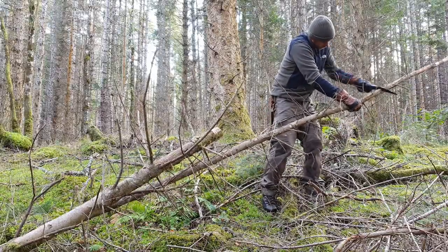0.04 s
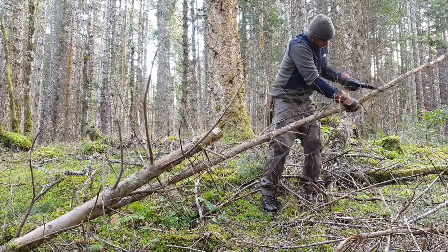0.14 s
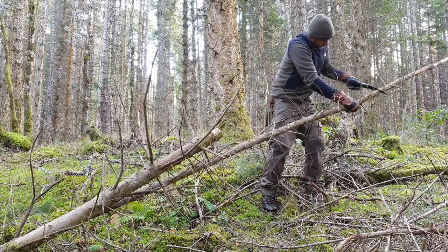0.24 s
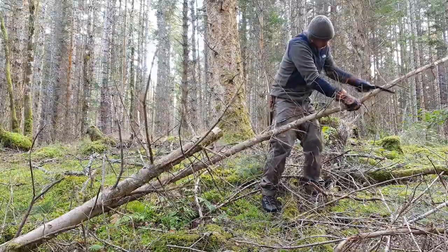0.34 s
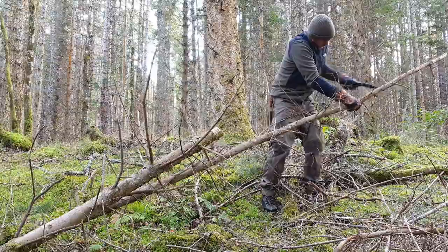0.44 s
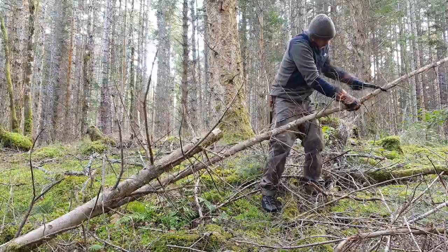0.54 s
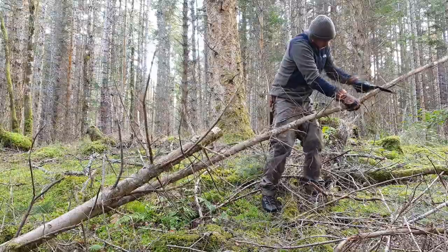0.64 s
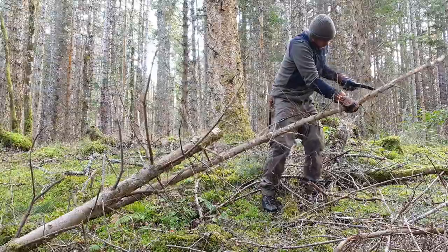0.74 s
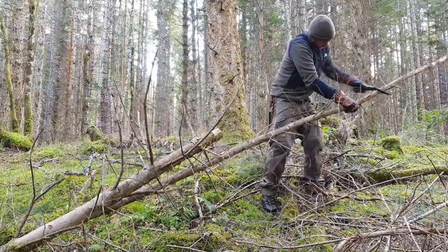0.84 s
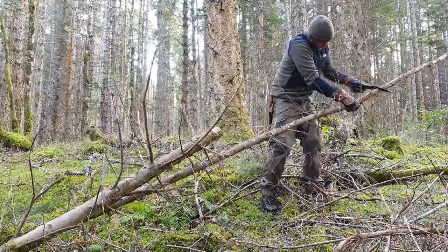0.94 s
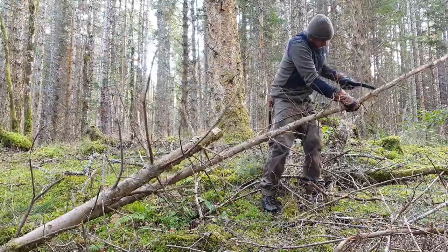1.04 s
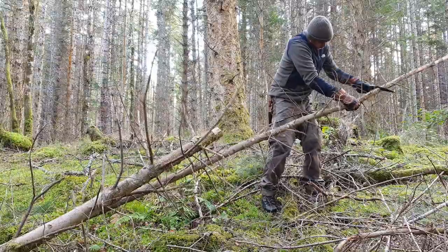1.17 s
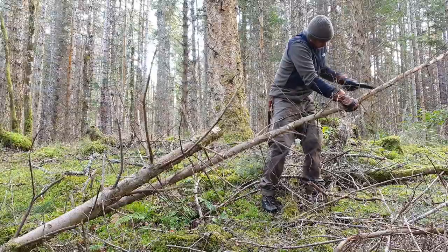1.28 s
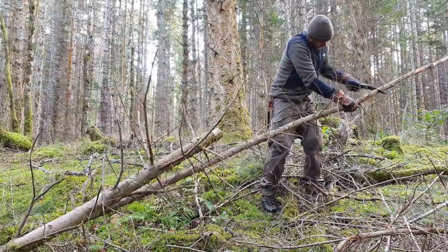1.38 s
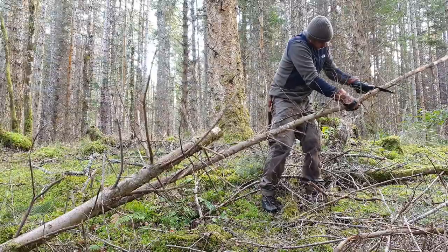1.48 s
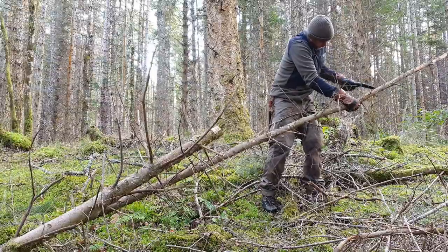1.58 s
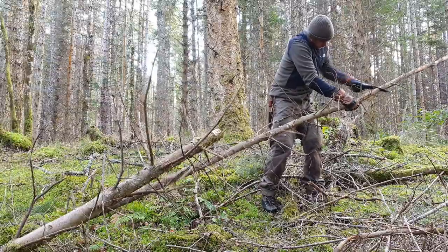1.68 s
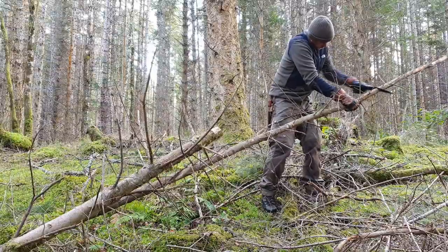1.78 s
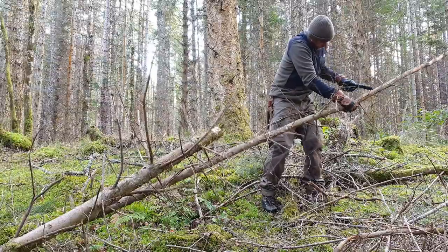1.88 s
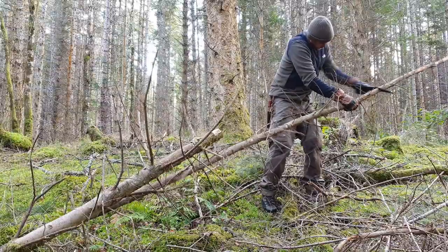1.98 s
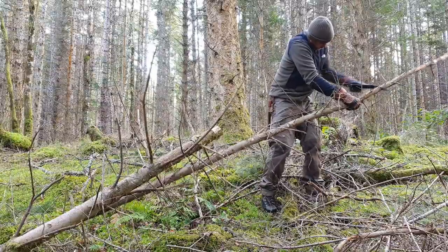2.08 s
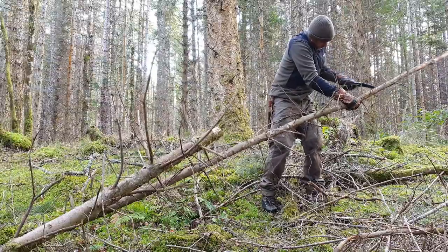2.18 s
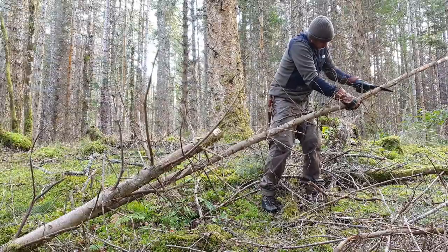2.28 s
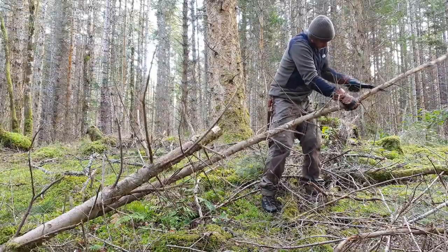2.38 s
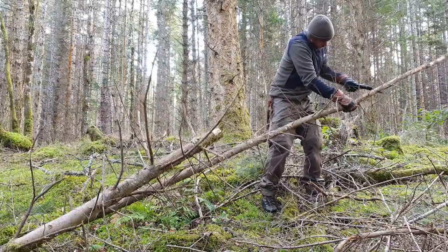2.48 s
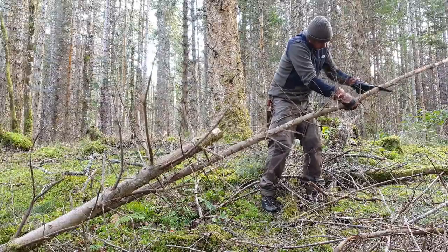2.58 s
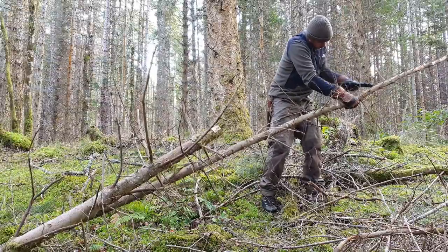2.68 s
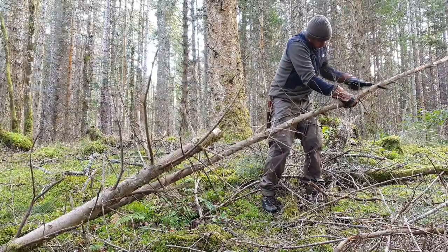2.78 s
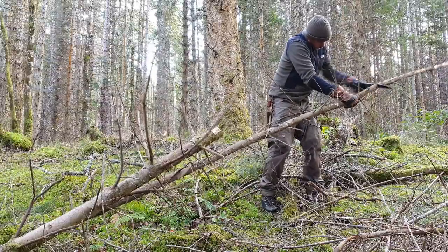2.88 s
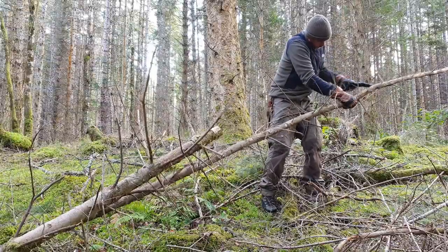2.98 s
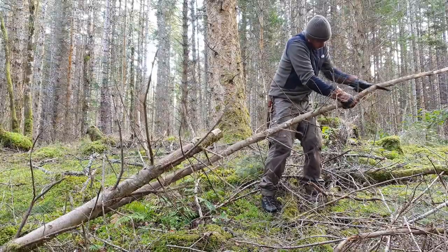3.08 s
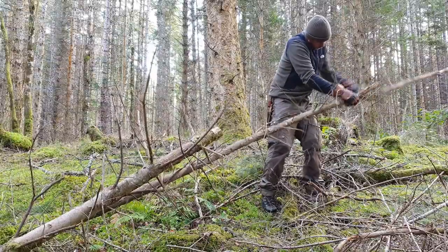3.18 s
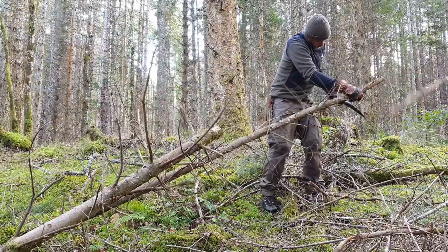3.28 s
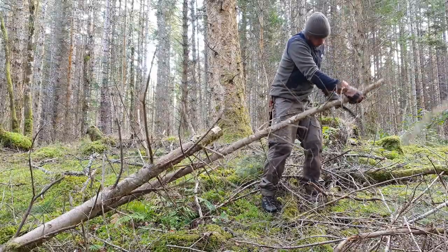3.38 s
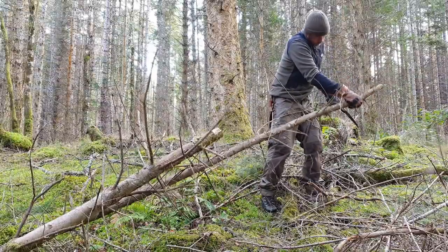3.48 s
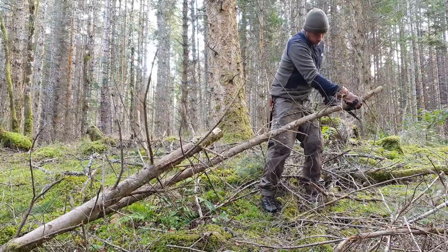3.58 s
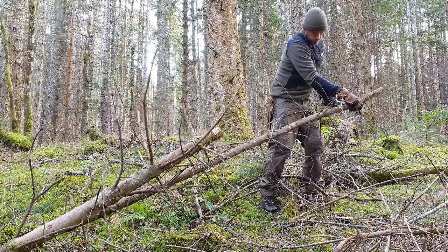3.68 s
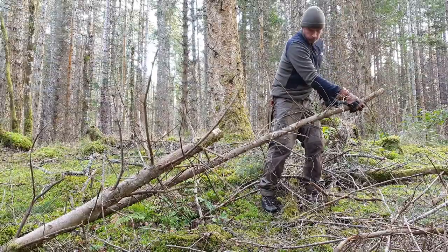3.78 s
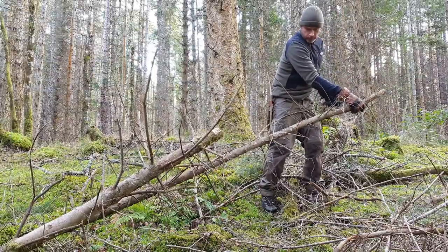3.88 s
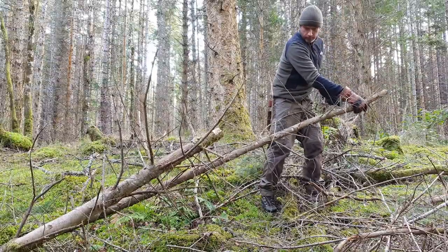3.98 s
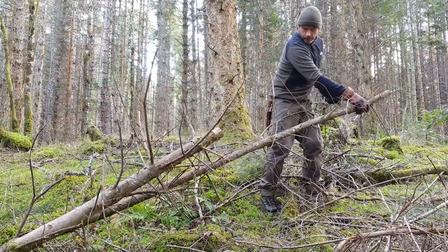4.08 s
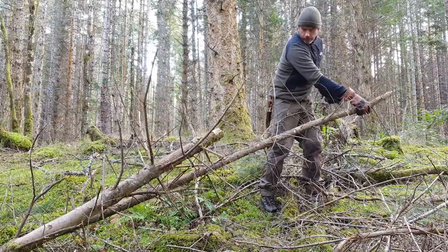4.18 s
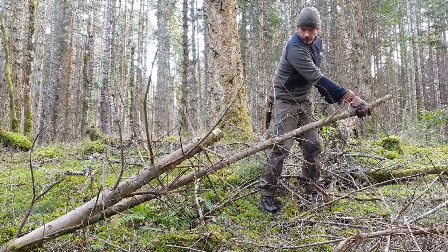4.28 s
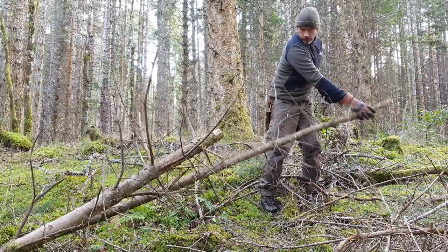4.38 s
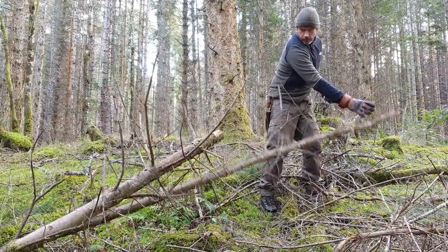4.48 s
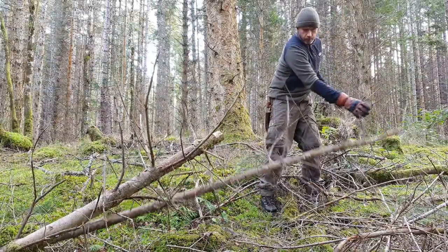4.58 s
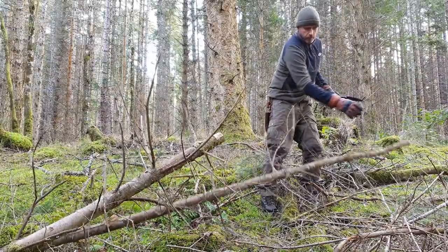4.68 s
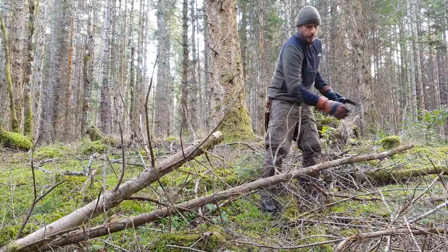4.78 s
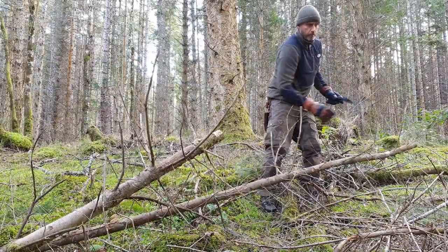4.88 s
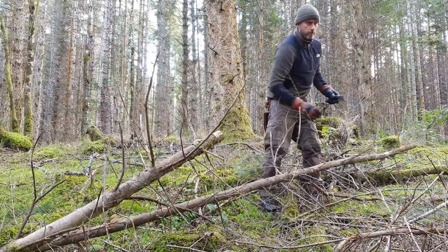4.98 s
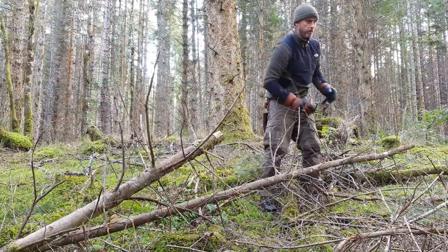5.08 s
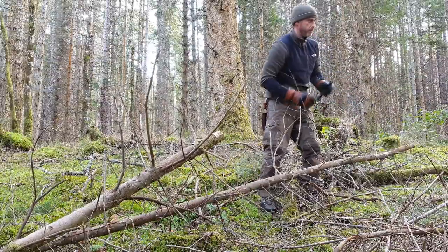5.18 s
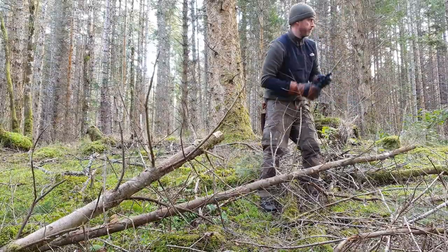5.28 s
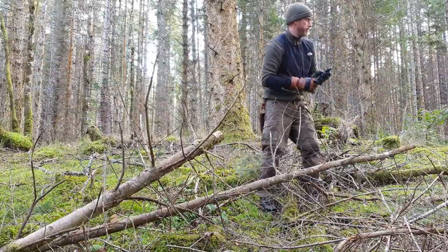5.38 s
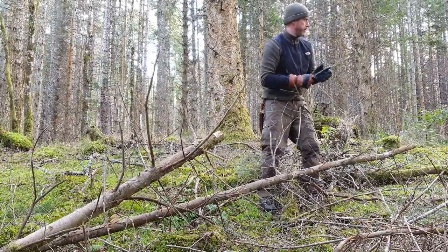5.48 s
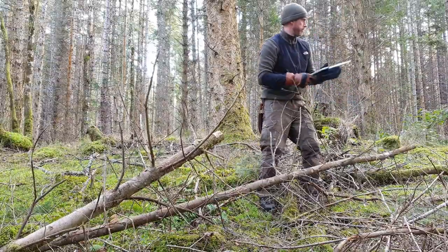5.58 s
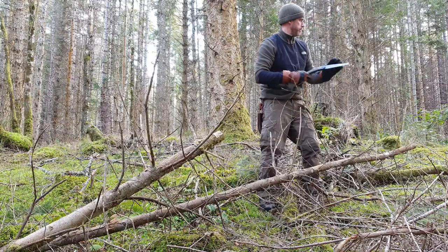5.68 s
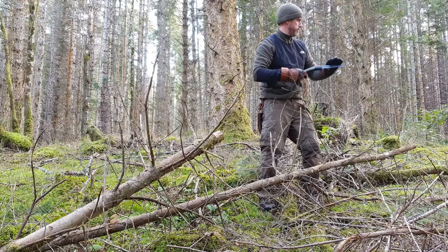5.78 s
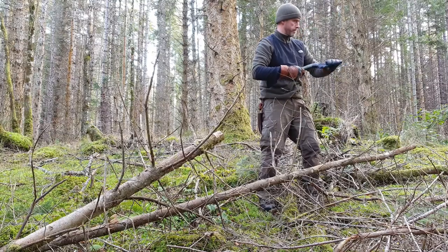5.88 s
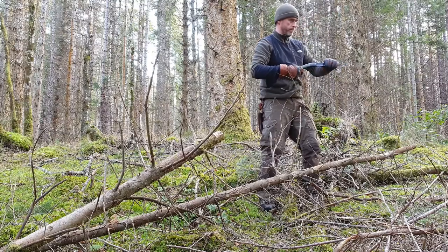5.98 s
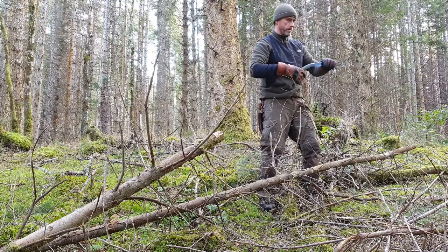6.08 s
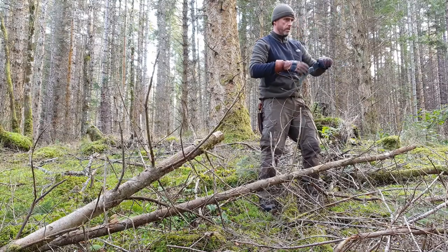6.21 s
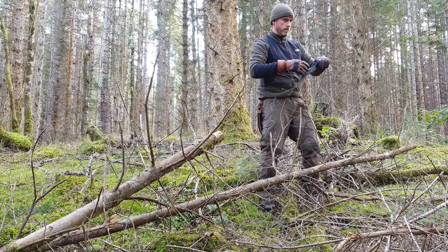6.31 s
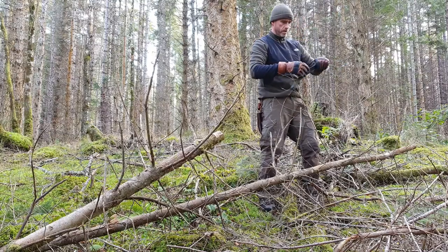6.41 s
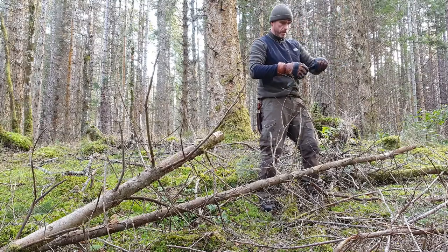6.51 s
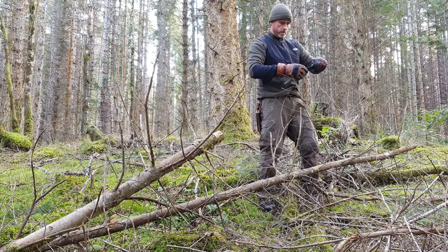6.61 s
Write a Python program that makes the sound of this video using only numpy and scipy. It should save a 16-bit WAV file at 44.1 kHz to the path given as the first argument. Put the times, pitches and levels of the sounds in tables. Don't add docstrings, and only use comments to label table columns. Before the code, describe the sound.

Fast, even sawing of dry wood outdoors ends in a sharp crack, landing clatter, a dropped stem snapping brushwood, and a faint folding scrape.

```python
import sys
import numpy as np
from scipy import signal
from scipy.fft import rfft, irfft, next_fast_len
from scipy.io import wavfile
from scipy.ndimage import uniform_filter1d

SR = 44100
rng = np.random.default_rng(int(sys.argv[2]) if len(sys.argv) > 2 else 0)


def store_pcm(level_fs):
    pcm = np.round(np.clip(level_fs, -1, 1) * 32767).astype(np.int16)
    wavfile.write(sys.argv[1], SR, np.atleast_2d(pcm).T)


def to_linear_factor(level_db):
    exponent = np.asarray(level_db, float) / 20
    return 10 ** exponent


N = 293253
TIME = np.arange(N) / SR


def evened(x):
    return x / np.sqrt(np.mean(x ** 2) + 1e-20)


def slow(noise, size):
    return evened(uniform_filter1d(uniform_filter1d(noise, size), size))


def read(points, hz):
    f, value = np.transpose(points)
    return np.interp(np.log(hz + 1), np.log(f + 1), value)


def add(mix, s, sound):
    start = round(s * SR)
    sound = sound[..., max(-start, 0):]
    part = mix[..., max(start, 0):][..., :sound.shape[-1]]
    part += sound[..., :part.shape[-1]]


def coloured(x, points):
    log_gain = read(points, np.fft.rfftfreq(4096, 1 / SR)) * np.log(10) / 20
    both_sides = np.r_[log_gain, log_gain[-2:0:-1]]
    minimum_phase = np.exp(np.conj(signal.hilbert(both_sides)))
    taps = np.fft.ifft(minimum_phase).real[:2048]
    return signal.oaconvolve(x, taps / np.linalg.norm(taps))[:len(x)]


def resonate(x, hz, width):
    r = np.exp(-np.pi * width / SR)
    return 2 * signal.lfilter([1 - r], [1, -r * np.exp(2j * np.pi * hz / SR)], x).real


def above(x, hz):
    return signal.sosfilt(signal.butter(2, hz, "high", fs=SR, output="sos"), x)


def below(x, hz):
    return signal.sosfilt(signal.butter(2, hz, "low", fs=SR, output="sos"), x)


# pitch_hz, level_db
PORT_DIFFERENCE = [(380, 1.5), (1290, 3), (2380, 1.5), (3100, 4), (4000, 2.5), (5400, 6), (7000, 1),
                   (9000, -4), (11500, -1), (15000, 0)]
# pitch_hz, turn_radians
PORT_TURN = [(700, 0), (1380, .3), (2330, 1.5), (3360, 0), (8000, -2), (10600, 0)]


def placed(x, lag, wet_db, shade=1):
    size = next_fast_len(len(x) + 64)
    hz = np.fft.rfftfreq(size, 1 / SR)
    aside = np.clip(lag / 6.5, 0, 1)
    phase = -np.pi * hz * lag / SR + .5 * aside ** 2 * read(PORT_TURN, hz)
    left = to_linear_factor(shade * read(PORT_DIFFERENCE, hz) / 2) * np.exp(1j * phase)
    spectrum = rfft(np.r_[np.zeros(32), x], size)
    pair = irfft(spectrum * np.array([left, 1 / left]), size)[:, 32:32 + len(x)]
    return pair, to_linear_factor(wet_db) * x


# pitch_hz, t60_s
FOREST_T60 = [(300, 0.808), (1500, 0.17), (4000, 0.42), (12000, 0.11)]
# pitch_hz, level_db
SCATTER = [(300, -5.5), (1000, -2), (3000, 1), (12000, 1.5)]


def forest(x):
    taps = np.zeros((2, SR))
    at = np.arange(100, SR - 20, 20) + rng.integers(0, 20, (2, (SR - 101) // 20))
    np.put_along_axis(taps, at, rng.choice([-1., 1.], at.shape), 1)
    hz, t, z = signal.stft(taps, SR, nperseg=256)
    trunks = to_linear_factor(-60 * t / read(FOREST_T60, hz)[:, None])
    ground = to_linear_factor(-60 * t / .075)
    fall = trunks * (1 + ground)
    tail = signal.istft(z * fall * to_linear_factor(read(SCATTER, hz))[:, None], SR, nperseg=256)[1]
    return signal.fftconvolve(x[None], tail / np.linalg.norm(tail[0]), axes=1)[:, :N]


def patchy(x):
    z = signal.stft(x, nperseg=256)[2]
    field = rng.standard_normal(z.shape[1:])
    field = evened(uniform_filter1d(uniform_filter1d(field, size=4, axis=0), size=6, axis=1))
    return signal.istft(z * to_linear_factor(2.5 * field), nperseg=256)[1][:, :N]


# start_s, length_s, rasp_db, tooth_knocks_db, upper_modes_db
STROKES = [(-0.04, 0.1646, -43.5, -7, 12.5), (0.105, 0.1304, -40.5, -2, 2.5),
           (0.252, 0.133, -45.5, -5.5, -8), (0.382, 0.1488, -40, -0.5, -4.5),
           (0.535, 0.1399, -41.5, 0.5, 4.5), (0.68, 0.1223, -38.5, -0.5, -3), (0.815, 0.1267, -42.5, 1, 4),
           (0.945, 0.1501, -38.5, -13, -18), (1.099, 0.119, -41, -2, 11),
           (1.245, 0.1237, -38.5, -9.5, -10.5), (1.375, 0.1335, -41, 1, -29), (1.505, 0.1422, -38.5, -3, 0),
           (1.654, 0.1278, -38.5, 0, 3.5), (1.797, 0.1288, -39.5, 2.5, 0), (1.93, 0.1445, -41, -0.5, 3),
           (2.07, 0.138, -39, 5.5, 13), (2.216, 0.1434, -41.5, 0, 4), (2.365, 0.131, -44, 0, -8),
           (2.494, 0.142, -44.5, 2.5, -18), (2.618, 0.137, -36.5, -6.5, 1.5),
           (2.77, 0.1259, -41.5, -6, -13), (2.898, 0.1171, -37.5, -1, 13.5),
           (3.046, 0.1104, -42.5, -4.5, -2.5)]
# start_s, length_s, grit_db
CONTACT = [(0.002, 0.081, -57.0), (0.124, 0.092, -54.2), (0.277, 0.074, -57.3), (0.412, 0.091, -52.5),
           (0.556, 0.088, -56.2), (0.7, 0.085, -53.1), (0.85, 0.062, -52.6), (0.973, 0.105, -52.8),
           (1.114, 0.099, -54.1), (1.264, 0.099, -53.1), (1.393, 0.086, -50.4), (1.529, 0.096, -53.1),
           (1.682, 0.083, -53.3), (1.818, 0.088, -54.9), (1.963, 0.085, -56.8), (2.085, 0.1, -51.3),
           (2.239, 0.096, -58.3), (2.395, 0.078, -58.3), (2.529, 0.075, -57.0), (2.637, 0.098, -50.4),
           (2.798, 0.061, -53.1), (2.914, 0.086, -49.3), (3.074, 0.084, -54.5)]
ARM = [(0.49, 60), (0.44, 58)]
# pressure_gain_along_stroke_db, fibre_drive_db, low_modes_gain_along_stroke_db
LEAN = [(-6.5, 6.5, -0.5), (10.5, 8.5, 11)]
LIFTED = [(.4, .13), (.13, .4)]
# pitch_hz, level_db_per_hz
PUSH_RASP = [(150, -17.5), (300, -24), (600, -12.5), (800, -14.5), (1330, -7.5), (2050, -6.5), (2600, -12),
             (4200, -12.5), (6500, -18.5), (10000, -19.5), (16000, -26)]
# pitch_hz, level_db_per_hz
PULL_RASP = [(150, -33), (300, -12.5), (550, -14.5), (1100, -4), (1400, -4.5), (1900, -6.5), (2600, -11.5),
             (4200, -9.5), (6500, -15.5), (10000, -18), (16000, -22.5)]
# pitch_hz, width_hz, push_db, pull_db
BRANCH = [(373, 167.5, -6.5, -6.5), (554.3, 184, -4.5, -9), (799.9, 63.7, -5, -6), (975.3, 21.6, 3, -2.5),
          (1107, 90, -5, -10.5), (1209.4, 21.1, -12, 0.5), (1675.6, 79, -12.5, -7.5),
          (2033.3, 71.4, -2, -15.5), (2625, 110, -12.5, -21.5)]


def saw():
    ringing, body, grit, blade = np.zeros((4, N))
    for k, (s, length, rasp_db, knock_db, upper_db) in enumerate(STROKES):
        way = k % 2
        place, tooth_count = ARM[way]
        pressure_db, fibre_db, low_db = LEAN[way]
        chance = rng.standard_normal((4 + len(BRANCH), int(length * SR)))
        u = np.linspace(0, 1, chance.shape[1])
        speed = np.sin(np.pi * u ** (np.log(.5) / np.log(place)))

        tooth_hz = tooth_count / length * np.sqrt(speed) * (1 + .08 * slow(chance[0], size=100))
        turns = np.cumsum(tooth_hz) / SR
        bite = to_linear_factor(4.2 * slow(chance[1], size=160))
        tooth_hits = np.diff(np.floor(turns), prepend=0) * bite * to_linear_factor(2 * chance[2])
        puffs = (0.5 + np.exp(-(turns % 1) / 0.356)) * np.sqrt(bite)
        fibres = chance[3] * puffs
        drive = to_linear_factor(knock_db) * evened(tooth_hits) + to_linear_factor(fibre_db - 9.5) * evened(fibres)

        bend = 1 + .025 * chance[2, 0]
        wood = np.zeros(len(u))
        for m, (hz, width, *db) in enumerate(BRANCH):
            upper, width = hz > 1900, max(width, 40)
            grip_db = 2.81 * slow(chance[4 + m], size=500)
            mode_db = db[way] + upper_db * upper + low_db * (u - .5) * (hz < 850) + grip_db
            mode = resonate(resonate(drive, hz * bend, 1.795 * width), hz * bend, 2.024 * width)
            wood += (-1) ** m * to_linear_factor(mode_db) * speed ** (1.6 * upper) * mode

        colour = (PUSH_RASP, PULL_RASP)[way]
        rasp = coloured(evened(fibres), colour)
        hiss = coloured(evened(chance[3, ::-1] * puffs), colour)
        free = np.clip((speed - 0.0886) / 0.67, .12, 1)
        force = to_linear_factor(rasp_db + pressure_db * (u - .5)) * free

        start, span, grit_db = CONTACT[k]
        since = s + u * length - start
        edge = np.minimum(since, span - since) / .012 + .7
        touch = np.clip(edge, np.where(u < .5, *LIFTED[way]), 1)
        touch = to_linear_factor(grit_db + 12.5) * speed ** 0.15 * touch / np.sqrt(bite)
        add(blade, s, to_linear_factor(-5) * touch * speed ** 0.58 * hiss)
        add(grit, s, touch * rasp)
        add(body, s, force * speed ** 0.906 * rasp)
        add(ringing, s, force * speed ** 0.239 * to_linear_factor(9.5) * wood)
    body, grit, blade = patchy(np.array([body, grit, blade]))
    kerf = ringing + below(body, 4516) + above(grit, 4516)
    near, far = placed(kerf, 7.19, -4.5)
    return near + placed(above(blade, 2370), -2, -99)[0], far


# pitch_hz, level_db_per_hz
HUSH = [(15, -43.5), (25, -23.5), (58, -3.5), (102, -15), (133, -12), (157, -33), (198, -14.5), (238, -19),
        (399, -15.5), (481, -17), (742, -16), (900, -19), (1600, -28.5), (3500, -51.5), (4550, -90),
        (7700, -120)]
# pitch_hz, likeness
LIKENESS = [(60, 1), (240, 0.942), (950, 0.0031), (3770, 0.14), (15000, 0.24)]
# time_s, level_db
DRONE = [(4.8, -85), (5.1, -81), (6.65, -87.5)]


def hush():
    frames, hz = N // 512 + 5, np.fft.rfftfreq(2048, 1 / SR)
    a, b, c, d = rng.standard_normal((frames, 1025, 4)).T
    same = np.clip(read(LIKENESS, hz), -1, 1)[:, None]
    left = a + 1j * b
    right = same * left + np.sqrt(1 - same ** 2) * (c + 1j * d)
    z = np.array([left, right]) * to_linear_factor(read(HUSH, hz)[:, None])
    air = evened(signal.istft(z, nperseg=2048, noverlap=1536)[1][:, :N])
    air = to_linear_factor(-60) * to_linear_factor([[2.5], [-.4]]) * air
    drone = evened(resonate(rng.standard_normal(N), 100, 5.8))
    return air + to_linear_factor(np.interp(TIME, *np.transpose(DRONE))) * drone


# time_s, peak_db, pitch_hz, width_s
GUSTS = [(0.022, -25, 90.5, 0.0104), (0.053, -20, 94.3, 0.0075), (0.108, -37.5, 75.5, 0.095),
         (0.223, -36.5, 57.5, 0.054), (0.251, -27, 64.2, 0.0182), (0.403, -31.5, 70.4, 0.0202),
         (0.45, -32.5, 97.1, 0.0265), (0.52, -39, 53.6, 0.0446), (0.623, -31, 80.7, 0.0416),
         (0.783, -28, 70.9, 0.046), (0.878, -31.5, 65.6, 0.021), (1.094, -27.5, 69.2, 0.0184),
         (1.149, -35, 62.2, 0.084), (1.189, -31, 92.3, 0.01), (1.362, -27.5, 76.4, 0.0189),
         (1.543, -26.5, 70, 0.0195), (1.58, -31, 70.7, 0.0296), (1.648, -21.5, 81, 0.013),
         (1.692, -24.5, 71.6, 0.08), (1.749, -26.5, 81.7, 0.011), (2.061, -30.5, 64.7, 0.0336),
         (2.123, -34, 68, 0.0393), (2.587, -31.5, 75.5, 0.075), (2.668, -31.5, 71.5, 0.0137),
         (3.107, -37, 71, 0.0199), (3.75, -45.5, 59, 0.0277), (4.032, -49, 59, 0.093),
         (4.322, -35.5, 67.4, 0.0394), (4.627, -40, 70.5, 0.053), (4.801, -46, 64.6, 0.12),
         (5.262, -45, 69, 0.024), (5.297, -30, 55.8, 0.0193), (5.343, -49, 67.4, 0.0347),
         (5.55, -49, 59, 0.047)]
# time_s, level_db
BREEZE = [(0.0, -38.5), (0.31, -55.5), (0.74, -50.5), (0.91, -55), (1.55, -58), (2.0, -51.5), (2.33, -59.5),
          (2.72, -55), (3.26, -66.5), (4.39, -68), (4.78, -54), (4.93, -63), (5.46, -70.5), (6.65, -79)]


def wind():
    right, t = np.zeros(N), np.arange(-3000, 3000) / SR
    for s, peak_db, hz, width in GUSTS:
        shape = np.exp(-np.log(16) * (t / np.clip(width, .012, .07)) ** 2)
        push = np.zeros(len(t))
        for ratio, gain in (1, 1), (2.01, 0.25), (0.79, 0.7275):
            push += gain * np.cos(2 * np.pi * (ratio * hz * t + rng.random()))
        add(right, s + t[0], to_linear_factor(peak_db) * shape * push)
    breeze = np.array([evened(resonate(resonate(v, 75, 50), 75, 50)) for v in rng.standard_normal((2, N))])
    breeze *= to_linear_factor(np.interp(TIME, *np.transpose(BREEZE))) * to_linear_factor([[-3], [3]])
    return breeze + right * to_linear_factor([[-27], [0]])


# start_s, peak_db, pitch_hz, t60_s
KNOCKS = [(1.308, -36.5, 362.6, 0.13), (1.598, -35, 374, 0.061), (1.686, -41, 398, 0.046),
          (1.884, -28.5, 582, 0.017), (2.034, -32.5, 392, 0.018), (2.149, -32, 407, 0.12),
          (2.584, -29.5, 457, 0.018), (2.966, -38.5, 363.6, 0.056), (3.696, -42.5, 548, 0.018),
          (3.961, -49, 504.7, 0.078), (4.551, -44, 680, 0.03), (4.615, -56, 436, 0.047),
          (4.757, -45.5, 751, 0.068)]


def stem_knocks():
    out, t = np.zeros(N), np.arange(5000) / SR
    for s, peak_db, hz, t60 in KNOCKS:
        swell = (1 - np.exp(-t / 0.00019)) * to_linear_factor(-60 * t / np.clip(t60, .02, .1))
        note = np.sin(2 * np.pi * (hz * t + rng.random()))
        add(out, s, to_linear_factor(peak_db) * swell / swell.max() * note)
    return placed(out, 4, -6.5)


# start_s, peak_db, ring_hz, treble_db
KERF = [(1.396, -58, 5970, 14.5), (1.7833, -35, 2700, -33.5), (2.6414, -37.5, 1805, -48.5),
        (2.814, -32, 1800, -34), (3.113, -46, 5000, -40.5), (3.1448, -45.5, 1990, -33.5)]
# start_s, peak_db, ring_hz, treble_db
FALLEN_END = [(3.1961, -40, 1290, -2), (3.3558, -50.5, 4950, -19.5), (3.3753, -54.5, 5500, -13.5),
              (3.4345, -49.5, 3000, 4.5), (3.4865, -43.5, 1510, -27), (3.5204, -44.5, 5870, -6.5),
              (3.5384, -47, 4340, -6), (3.5683, -31.5, 4120, 18), (3.8786, -48, 3630, 9.5),
              (3.9609, -43, 4060, -6.5), (3.9934, -55, 3500, -5)]
# start_s, peak_db, ring_hz, treble_db
DROPPED_STEM = [(4.3465, -63, 2080, -26), (4.3844, -61, 1980, -35), (4.4917, -46, 2970, -23),
                (4.5236, -47, 1690, 1)]
# start_s, peak_db, ring_hz, treble_db
REBOUND = [(4.7109, -38.5, 1700, -21.5), (4.8618, -41.5, 2990, -14.5), (4.9744, -53, 1100, -39)]
# snaps, left_lag_samples, ring_t60_s, ring_share
SPOTS = [
    (KERF, 3.96, 0.035, 0.5),
    (FALLEN_END, 3.2, 0.015, 0.2),
    (DROPPED_STEM, -2.8, 0.0091, 0.4),
    (REBOUND, 2.9, 0.025, 0.2),
]
# pitch_hz, level_db_per_hz, share_of_treble_change_0_to_1
CRACK = [(244.3, -39, 0.13), (493, -9.5, 0.8), (1680, -4, 0.07), (3000, 2.5, 0.6), (6200, 2, 0.3),
         (10100, -9.5, 0.87), (17000, -7, 0.5)]


def snap_of_wood(hz, treble_db, t60, ring):
    t = np.arange(2000) / SR
    fall = to_linear_factor(-60 * t / (0.2 * t60)) + 0.081 * to_linear_factor(-60 * t / .05)
    splinter = rng.standard_normal(2000) * np.minimum(t / .0008, 1) ** 2 * fall
    splinter *= to_linear_factor(2.5 * slow(rng.standard_normal(2000), size=30))
    splinter[42] += 2.4 * abs(splinter).max()
    colour = [(f, db + share * (treble_db + 15.5)) for f, db, share in CRACK]
    broad = evened(coloured(splinter, colour))
    return broad, broad + ring * evened(resonate(splinter, hz, 5 / t60))


def cracks():
    near, far = np.zeros((2, N)), np.zeros(N)
    for snaps, lag, t60, ring in SPOTS:
        for s, peak_db, hz, treble_db in snaps:
            broad, snap = snap_of_wood(hz, treble_db, t60, ring)
            scale = to_linear_factor(peak_db + 11.5) / abs(snap).max()
            add(near, s, placed(scale * snap, lag, -99)[0])
            add(far, s, to_linear_factor(-11) * scale * broad)
    return near, far


# pitch_hz, level_db_per_hz
SHARDS = [(400, -30), (1200, -9), (3300, -0.5), (5200, -7), (9500, -1.5), (14500, -3.5), (17000, -9)]
# pitch_hz, width_hz, level_db
HINGE = [(707.7, 110, -7), (1100, 150, -11), (1539, 170, -5.5), (1715, 376, 22.5), (3420, 330, 6.5),
         (6320, 460, -12), (9580, 230, -25), (12400, 340, -22)]
# pitch_hz, width_hz, level_db
LIMB = [(1136, 170, -5.5), (2600, 460, -14), (3500, 290, -0.5), (5000, 930, -7), (6640, 650, -12),
        (9760, 900, -8), (12500, 900, -25.5), (14500, 710, -4.5)]
# pitch_hz, width_hz, level_db
TWIG = [(1670, 400, -5.5), (2700, 290, -3.5), (3640, 180, -5), (4220, 300, 1), (6030, 610, 3),
        (9000, 600, -17), (12700, 750, -14), (15200, 600, -11.5)]
# pitch_hz, width_hz, level_db
SPUR = [(2514, 290, -6), (6180, 540, -1.5), (7050, 300, 2), (9530, 400, -6), (12100, 500, -7.5),
        (14400, 600, -12)]
# pitch_hz, width_hz, level_db
STEM = [(770, 200, -13), (1864, 400, -7), (3100, 647, 3), (3700, 500, -9.5), (4740, 420, 0.5),
        (5900, 598, -11), (9720, 700, 1), (11300, 800, -9), (12700, 900, -8.5), (14900, 750, -1)]
# (start_s, peak_db, rise_s, tearing_t60_s)
BREAKS = [
    (HINGE, 4.05, 1.8, -11.5, [(2.9174, -11.5, .0018, 0.0147)]),
    (LIMB, 11.42, 1.26, -10.5, [(3.6879, -19, .0005, .02), (3.6932, -23, .0006, 0.013), (3.6991, -15, .0005, 0.017), (3.7085, -37, .001, .02), (3.732, -33.5, .002, 0.027)]),
    (TWIG, -2.5, 5.1, -13.5, [(4.5523, -16, .0007, 0.017)]),
    (SPUR, 0.34, 1.28, -10, [(4.6151, -20.5, .0008, 0.0066)]),
    (STEM, 3.4, 5.8, -9.5, [(4.7516, -7.5, .0006, 0.016), (4.7655, -28, .001, 0.016)]),
]


def breaks():
    near, far, t = np.zeros((2, N)), np.zeros(N), np.arange(2000) / SR
    for modes, lag, shade, wet_db, blows in BREAKS:
        for s, peak_db, rise, t60 in blows:
            after = np.maximum(t - rise, 0)
            swell = np.minimum(t / rise, 1) ** 2 * to_linear_factor(-60 * after / t60)
            tear = swell * (0.5 * rng.standard_normal(2000) + rng.choice([-1., 1.], 2000))
            tear[round(rise * SR)] += 3
            broad = coloured(tear, SHARDS)
            snap = 0.15 * broad
            for hz, width, db in modes:
                early = tear * to_linear_factor(-0.2 * hz * after)
                snap = snap + to_linear_factor(db) * resonate(early, hz, width)
            snap = to_linear_factor(peak_db) / abs(snap).max() * snap
            pair, wet = placed(snap, lag, wet_db, np.clip(shade, 1, 2.2))
            add(near, s, pair)
            add(far, s, 0.6 * wet + 0.87 * np.std(wet) * evened(broad))
    return near, far


# peak_s, level_db, rise_s, fall_db_per_s, treble_db
STIRS = [(3.12, -58.5, 0.108, 68, 9.5), (3.3, -62.5, 0.18, 65, 11.5), (3.44, -69.5, 0.0184, 33, -10),
         (3.57, -56, 0.0696, 91, 20), (3.709, -56.5, 0.013, 185.5, 17.5), (3.968, -62.5, 0.053, 56.5, 15.5),
         (4.42, -84, 0.33, 19.5, -1.5), (4.57, -53.5, 0.114, 56, 12), (4.625, -57.5, 0.05, 109.5, 16),
         (4.67, -61, 0.024, 200, 6.5), (4.78, -60.5, 0.0166, 166, -5.5), (4.95, -75, 0.089, 69.5, 2.5),
         (5.09, -70, 0.057, 201.5, 11.5), (5.3, -86.5, 0.081, 16, -4.5), (6.1, -86.5, .05, 57.5, 0),
         (6.315, -75, 0.0485, 296.5, 0), (6.475, -67.5, 0.0293, 350.5, 12.5)]
# pitch_hz, level_db_per_hz
TWIGS = [(300, -7.5), (600, 2), (1100, 4), (2200, 0), (3500, 2.5), (5000, -4.5), (6500, -17.5),
         (10000, -17.5), (16000, -21)]


def rustle():
    sizes = to_linear_factor(3.2 * np.minimum(rng.exponential(1, N), 4.5))
    struck = rng.random(N) < 9000 / SR
    ticks = evened(coloured(sizes * rng.standard_normal(N) * struck, TWIGS))
    ticks = evened(ticks * to_linear_factor(2.5 * slow(rng.standard_normal(N), size=250)))
    out = np.zeros(N)
    for s, level_db, rise, fall_db, treble_db in STIRS:
        shape_db = np.where(TIME < s, -18.5 * (s - TIME) / rise, fall_db * (s - TIME))
        live = shape_db > -40
        stirred = ticks[live]
        stirred = stirred + (to_linear_factor(treble_db) - 1) * above(stirred, 7500)
        out[live] += stirred * to_linear_factor(level_db + 1 + shape_db[live])
    return placed(out, 5.07, -1.2)


# start_s, peak_db
FOLD = [(5.0547, -58.5), (5.0711, -59), (5.0781, -52.5), (5.087, -55.5), (4.7, -59.5), (5.103, -58),
        (5.113, -60.5)]
# pitch_hz, width_hz, level_db
HANDLE = [(2480, 41, 2), (3540, 60, -2), (4970, 27, -9.5), (5900, 34, -6.5), (6660, 60, -8.5),
          (9900, 54, -31.5), (12200, 91, -21.5), (14000, 98, -23), (15400, 100, -7)]
# start_s, level_db, pitch_hz, t60_s
TINGS = [(5.851, -68, 12100, 0.176), (6.055, -77, 6632, 0.14), (6.055, -82, 8300, .1),
         (6.055, -74.5, 13480, .08)]


def folding():
    clicks, t = np.zeros(N), np.arange(8000) / SR
    short = t[:1500]
    for s, peak_db in FOLD:
        swell = to_linear_factor(peak_db - 60 * short / 0.023) * np.minimum(short / 0.0011, 1)
        add(clicks, s, swell * rng.standard_normal(1500))
    handle = sum(to_linear_factor(db) * resonate(clicks, hz, width + 150) for hz, width, db in HANDLE)
    out = to_linear_factor(13.5) * handle + 0.96 * coloured(clicks, TWIGS)
    for s, db, hz, t60 in TINGS:
        add(out, s, to_linear_factor(db - 60 * t / t60) * np.sin(2 * np.pi * hz * t) * (1 - np.exp(-t / 0.005)))
    return placed(out, 1.7, -10)


def scene():
    near, far = zip(saw(), stem_knocks(), cracks(), breaks(), rustle(), folding())
    return sum(near) + forest(sum(far)) + wind() + hush()


def band_limit(x):
    return signal.sosfilt(signal.butter(12, 17130, fs=SR, output="sos"), x)


# pitch_hz, level_db
CASING = [(4200, 1), (4950, -2.5), (5700, 0.5), (6800, 2.5), (7500, -10), (8300, -1.5), (9600, 0.5),
          (10600, -4), (13500, -0.5), (15700, -0.5), (16400, -28), (17200, -48)]
# pitch_hz, level_db_per_hz
HISS = [(1500, -20), (3500, 0), (5000, -4), (6500, -3), (7300, -7), (8000, -5), (10000, -5), (15700, -6),
        (16500, -30)]


def record(dry):
    size = next_fast_len(N)
    casing = to_linear_factor(read(CASING, np.fft.rfftfreq(size, 1 / SR)))
    heard = irfft(rfft(dry, size) * casing, size)[:, :N]
    hiss = np.array([coloured(v, HISS) for v in rng.standard_normal((2, N))])
    hiss *= to_linear_factor(-88.5) * to_linear_factor([[4], [2.2]])
    return band_limit(heard + hiss)


dry = scene()
out = record(dry)
store_pcm(out)
```